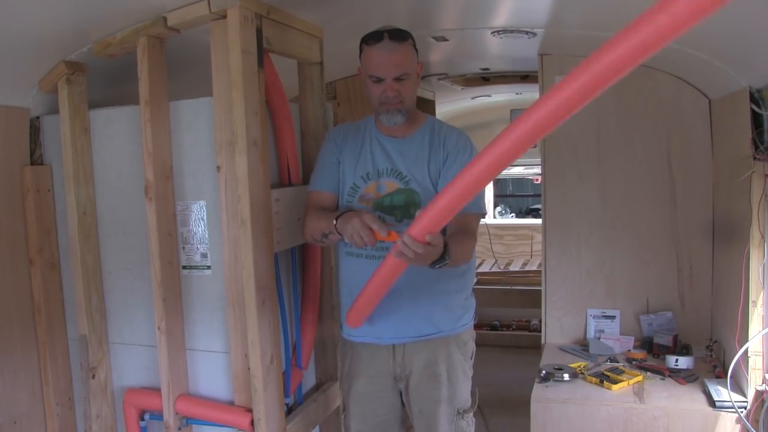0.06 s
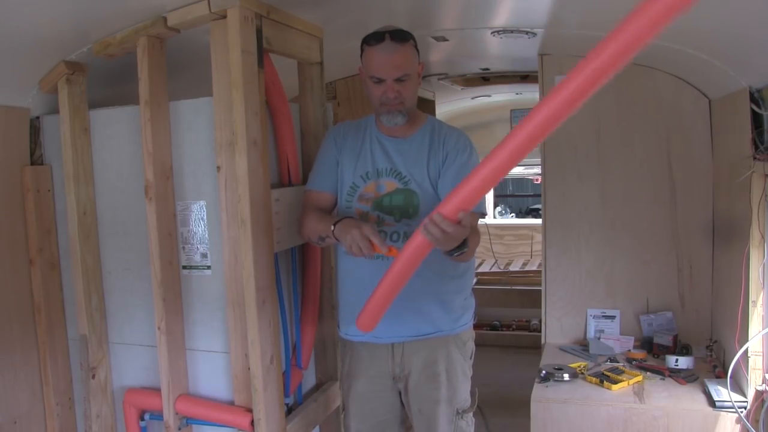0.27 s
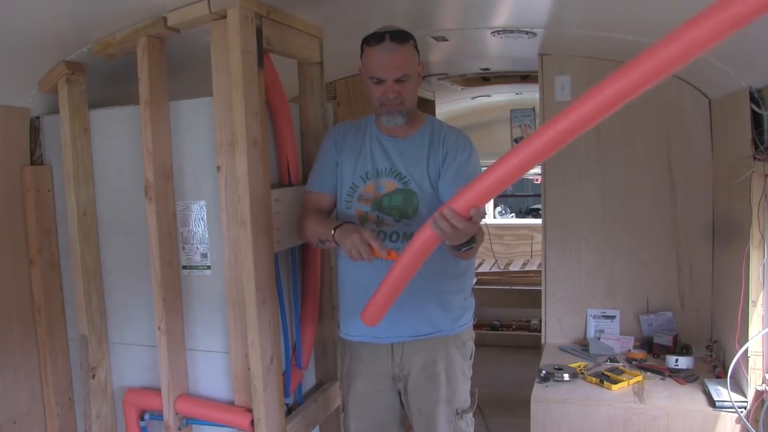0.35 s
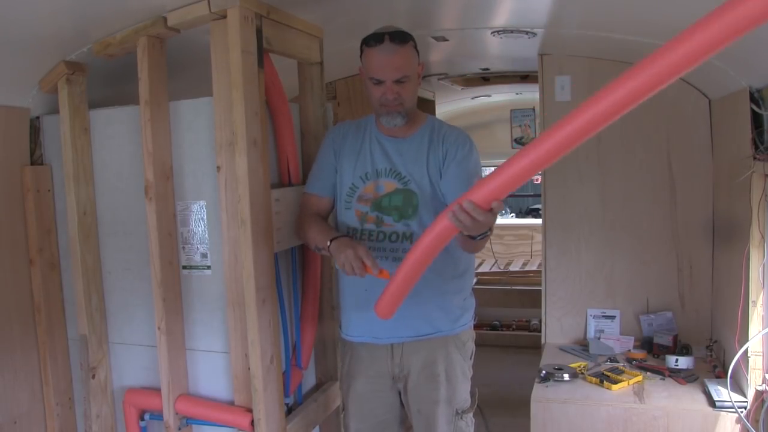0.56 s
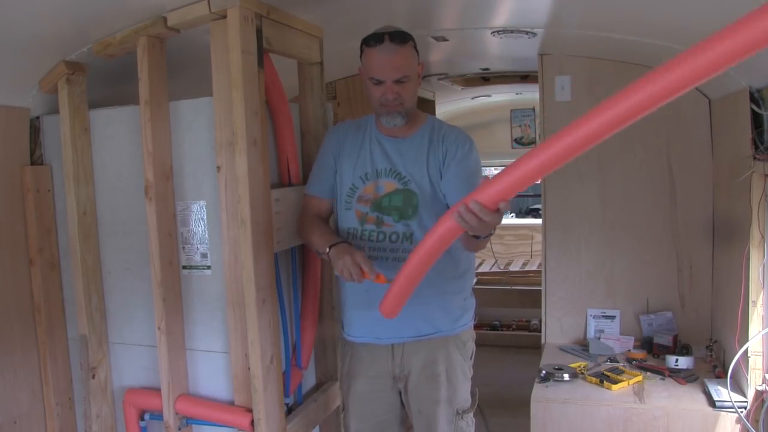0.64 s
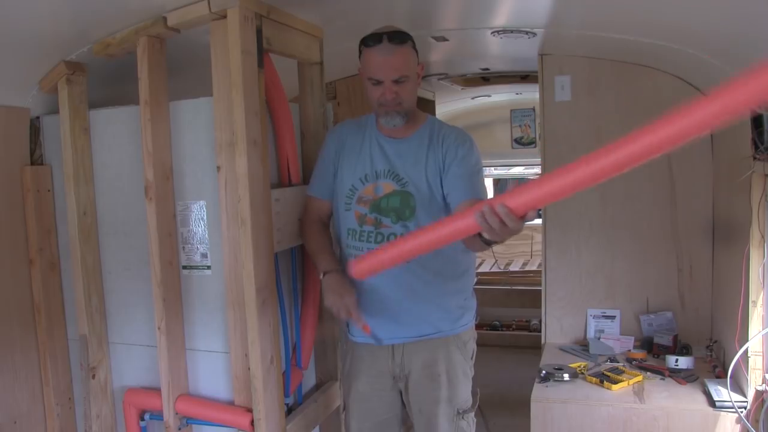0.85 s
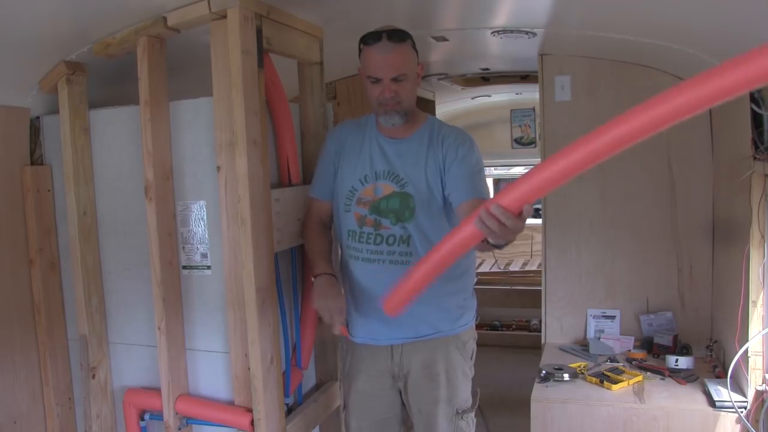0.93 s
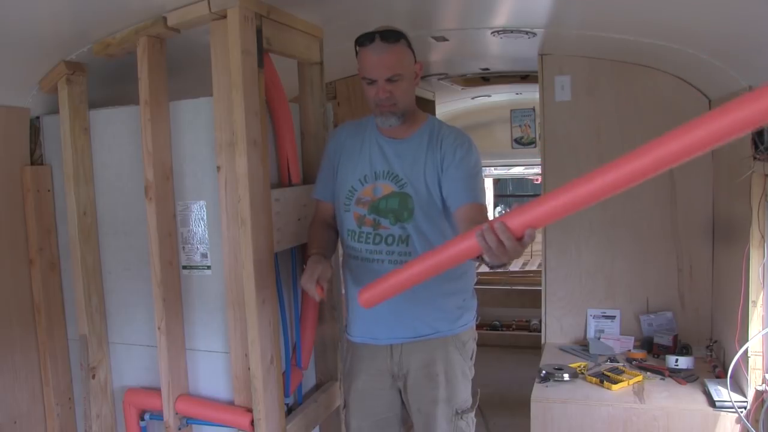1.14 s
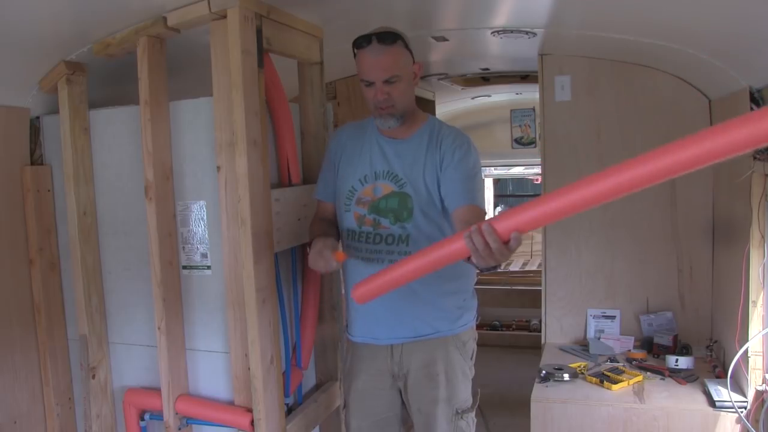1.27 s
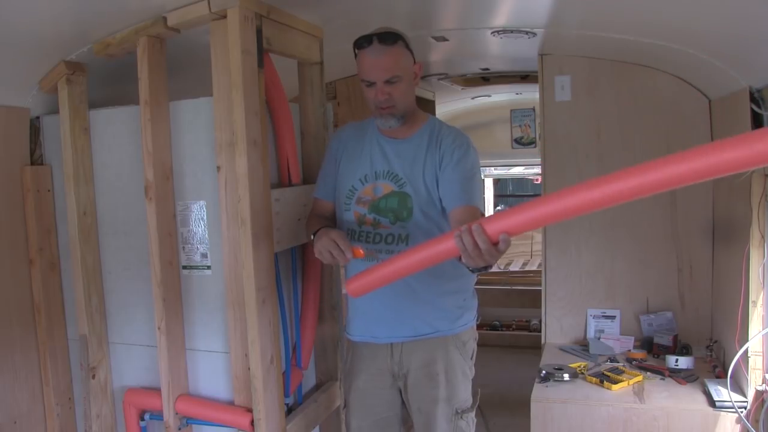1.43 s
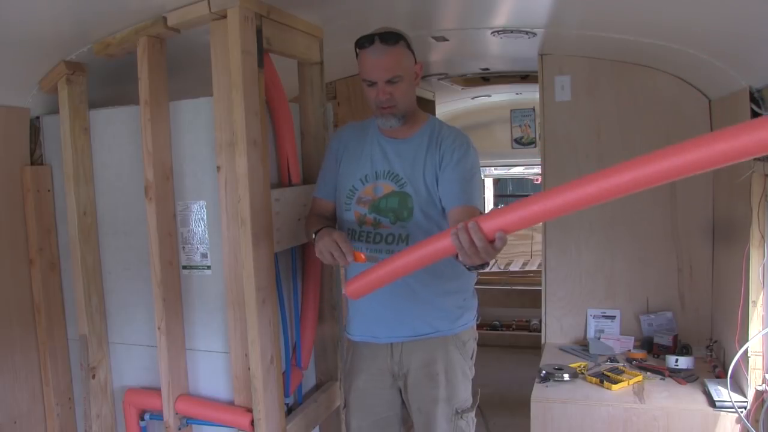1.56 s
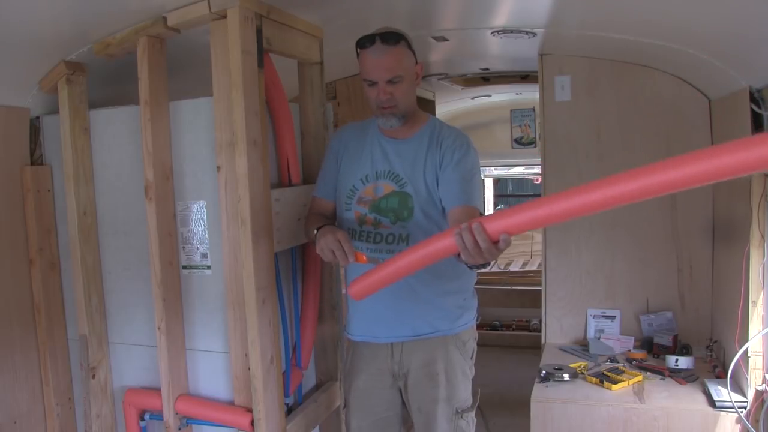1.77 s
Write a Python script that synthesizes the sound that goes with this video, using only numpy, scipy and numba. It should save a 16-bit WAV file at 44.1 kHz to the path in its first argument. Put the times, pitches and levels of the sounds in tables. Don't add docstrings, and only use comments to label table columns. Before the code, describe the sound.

Foam tube being cut: hands rub it softly for 0.2 s, then a blade rips it in five uneven, crackly, hollow strokes until about 0.97 s, with sharp snaps near 0.8 and 0.9. The freed end knocks and bounces dully from 0.98 to 1.1, rustling. Light rubbing fades by 1.4; two faint rising bird whistles follow at 1.5 and 1.65, with tiny creaks and faint rubbing. Close, small wooden room, quiet hiss.

```python
import sys
import numpy as np
from scipy import signal
from scipy.fft import rfft, irfft
from scipy.io import wavfile
from scipy.ndimage import uniform_filter1d
from numba import njit

SR = 44100
rng = np.random.default_rng(int(sys.argv[2]) if len(sys.argv) > 2 else 0)


def unload_wav(signal):
    wavfile.write(
        sys.argv[1],
        SR,
        np.round(np.clip(np.atleast_2d(signal).T, -1, 1) * 32767).astype(np.int16),
    )


def amplitude_ratio(level_db):
    exponent = np.asarray(level_db, float) / 20
    return 10 ** exponent


N = 79380


def level(x, db):
    return x * amplitude_ratio(db) / np.sqrt(np.mean(x ** 2))


@njit
def svf(x, hz, width):
    y = np.empty(len(x))
    band, low = 0., 0.
    for i in range(len(x)):
        g = np.tan(np.pi * hz[i] / SR)
        k = width / hz[i]
        v = (band + g * (x[i] - low)) / (1 + g * (g + k))
        low += 2 * g * v
        band = 2 * v - band
        y[i] = k * v
    return y


def walk(rate):
    hold = int(SR / rate)
    steps = rng.standard_normal(N // 40)[np.arange(N) // hold]
    slewed = uniform_filter1d(uniform_filter1d(steps, hold), hold)
    return 0.74 * slewed


def ring(at, hz, t60, push=0.):
    t = np.maximum(np.arange(N) / SR - at, 0)
    decay = np.exp(-np.log(1000) * t / t60)
    onset = 1 - np.exp(-t / push) if push else 1
    return np.sin(2 * np.pi * hz * t) * decay * onset


def air():
    # f/Hz, level/dB per Hz
    air_spectrum = [(18, -18), (30, -15), (114, -10), (208, -18), (399, -22), (874, -22.5), (1080, -25),
                    (1170, -25.5), (15500, -36)]
    knot_hz, knot_db = np.array(air_spectrum).T
    hz = np.maximum(np.arange(N // 2 + 1) * SR / N, 1)
    shape = amplitude_ratio(np.interp(np.log(hz), np.log(knot_hz), knot_db))
    noise = irfft(rfft(rng.standard_normal(N)) * shape, N)
    return level(noise, -58) * amplitude_ratio(1.4 * walk(4.7))


def bursting_cells():
    cells_per_s, spread_db, judder_db, judder_per_s = 14000, 1.5, 1.5, 160
    burst = rng.random(N) < cells_per_s / SR
    strength = amplitude_ratio(spread_db * rng.exponential(size=N)) * rng.standard_normal(N)
    return burst * strength * amplitude_ratio(judder_db * walk(judder_per_s)) + 1e-18


def tube_body(cells, favour, hollow, hum):
    # f/Hz, width/Hz, level/dB
    tube_modes = [(221, 136, -6), (637, 147, 1), (747, 227, -1.5), (971, 84, -2), (1170, 353, 1),
                  (1554, 443, 2.5), (1930, 348, 2.5), (2506, 570, 1.5), (3130, 866, -3)]
    favour_db, favour_oct, wander_db, wander_per_s, drift = 3.5, 0.61, 2.5, 45, .025
    body = 0
    for k, (hz, width, db) in enumerate(tube_modes):
        lift_db = favour_db * np.exp(-(np.log2(hz / favour) / favour_oct) ** 2)
        lift_db = lift_db + hollow * (700 < hz < 1150) + hum * (hz < 300)
        gain = amplitude_ratio(db + lift_db + wander_db * walk(wander_per_s))
        centre = hz * (1 + drift * walk(19.35))
        body = body + (-1) ** k * gain * svf(cells, centre, 1. * width)
    return body


def tearing_walls(cells):
    # f/Hz, width/Hz, level/dB
    tear_bands = [(4480, 2480, -11), (6330, 900, -10.5), (7140, 1340, -13), (12140, 6540, -19),
                  (13630, 9600, -20.5)]
    tear = 0
    for k, (hz, width, db) in enumerate(tear_bands):
        centre = np.full(N, 1. * hz)
        band = svf(svf(cells, centre, 2. * width), centre, 1. * width)
        tear = tear + (-1) ** k * amplitude_ratio(db + 2.0 + walk(39.3)) * band
    return tear


def rubbed_and_cut_foam():
    # t/s, effort/dB, favoured f/Hz, brightness/dB
    rub_strokes = [
        [(0.0, -37.5, 2520, 8.5), (0.03, -44, 2500, 9), (0.06, -51, 2070, 6), (0.092, -38, 1780, 4.5),
         (0.132, -51.5, 1810, 0), (.14, -40, 1870, 0.5), (.19, -36, 2110, 4), (0.218, -29.5, 2080, 3),
         (0.226, -36, 1990, 3)],
        [(1.15, -50, 1550, -3), (1.186, -64, 2280, 2), (1.194, -45, 2180, 3), (1.248, -50.5, 2310, 5.5),
         (1.28, -39.5, 2100, 9.5), (1.402, -74, 1970, 14), (1.43, -78.5, 1720, 13)],
        [(1.585, -52.5, 2800, 9), (1.6, -50, 2660, 2), (1.66, -56.5, 2180, -5), (1.71, -71, 2200, 16),
         (1.75, -53.5, 2550, 6.5), (1.8, -51, 2570, 6)],
    ]
    # t/s, effort/dB, favoured f/Hz, brightness/dB, hollowness/dB
    cut_strokes = [
        [(0.226, -26.5, 1560, 6.5, -1), (.24, -20.5, 1600, 3, 2), (.25, -25.5, 1720, 6, -12),
         (0.255, -15, 1710, 3, -21), (.272, -16, 1760, 1.5, -1), (.284, -13.5, 1800, -0.5, -12),
         (.305, -19.5, 1860, 4.5, 10), (0.32, -17, 1640, 2.5, 2.5), (0.352, -15.5, 1500, -4, -0.5)],
        [(.352, -21, 1970, 4.5, 7.5), (.4, -22, 1910, 2, 4.5), (0.455, -27, 1800, 5.5, 8),
         (0.49, -23, 1670, 3.5, -4.5)],
        [(0.49, -19.5, 1860, -5, -4), (.505, -20.5, 1730, 3.5, 5.5), (0.536, -16.5, 1280, 0.5, -4.5),
         (.57, -22, 1320, 2.5, 3.5), (.592, -23, 1440, 1.5, 1), (.604, -20, 1540, 2, -9),
         (.616, -25, 1420, 4.5, -3)],
        [(.616, -25.5, 1300, 8, 13.5), (.63, -21, 1280, -0.5, 1), (0.655, -18.5, 1510, 2, 2.5),
         (.68, -26.5, 1800, 3.5, 3), (0.714, -20, 1950, 3.5, -4.5), (0.734, -34.5, 1770, 7, 18.5),
         (0.77, -38, 1890, 14, -16)],
        [(0.77, -30, 2310, 2, 0), (.795, -18, 2500, -0.5, 1), (0.808, -15.5, 2500, 0, -3),
         (0.835, -18.5, 2430, -1, 11.5), (.86, -22, 1590, 4, 4.5), (0.885, -17, 1300, -1.5, 4.5),
         (.905, -22, 1420, -4, 6.5), (0.936, -33.5, 1540, 8, 11.5), (0.975, -32.5, 1900, -6, -12)],
    ]
    # t/s, effort/dB, favoured f/Hz, brightness/dB
    settle_strokes = [
        [(.975, -38, 2100, 5), (1.01, -34.5, 1960, -3), (1.04, -43.5, 1980, 9), (1.06, -40, 1910, 3.5),
         (1.15, -54.5, 2000, 8)],
    ]
    hum_steady, hum_at_db = 0.59, -19.5
    t = np.arange(N) / SR
    effort, hollow, bright, hum = np.zeros((4, N))
    favour = np.full(N, 1170.)
    for rows in cut_strokes + rub_strokes + settle_strokes:
        s, db, hz, bright_db, *hollow_db = np.array(rows).T
        on = (t >= s[0]) & (t <= s[-1])
        effort_db = np.interp(t[on], s, db)
        effort[on] = amplitude_ratio(effort_db)
        favour[on] = np.interp(t[on], s, hz)
        bright[on] = np.interp(t[on], s, bright_db)
        hollow[on] = np.interp(t[on], s, hollow_db[0]) if hollow_db else 0
        hum[on] = hum_steady * (hum_at_db - effort_db) if hollow_db else 0
    effort = uniform_filter1d(effort, size=90)
    cells = bursting_cells()
    both = tube_body(cells, favour, hollow, hum) + amplitude_ratio(bright) * tearing_walls(cells)
    slow_rms = np.sqrt(uniform_filter1d(both ** 2, size=2600))
    return effort * both / slow_rms


def knocks():
    # t/s, peak level/dB, f/Hz, ring T60/s, hardness/dB
    knock_events = [(0.134, -35.5, 501, 0.034, 1), (0.977, -10.5, 192, 0.037, -4.5),
                    (0.993, -13, 136, 0.027, 4), (.996, -20.5, 391, 0.042, 6), (.996, -28.5, 693, 0.079, 4),
                    (1.004, -9, 253.5, 0.032, -1.5), (1.016, -9.5, 360, 0.026, -1),
                    (1.026, -21.5, 210, 0.049, -12), (1.046, -17.5, 435, 0.029, 1),
                    (1.056, -8.5, 263, 0.019, -1), (1.067, -16, 343, 0.04, -5),
                    (1.079, -22, 472, 0.031, -9), (1.092, -37, 405, 0.029, 13),
                    (1.105, -25.5, 273, 0.03, -7), (1.1963, -24.5, 169, 0.03, -12),
                    (1.2117, -22.5, 148, 0.017, -19), (1.244, -36.5, 149, 0.03, -25),
                    (1.269, -43, 104, 0.14, -17)]
    # frequency ratio, level/dB
    overtones = [(.55, -16), (1.699, -6.5), (2.4, -7)]
    gain_db, push_s = 5, 0.0027
    boom_hz, boom_db, boom_t60_s = 112.8, -24, .35
    out = 0
    for at, db, hz, t60, hard_db in knock_events:
        blow = ring(at, hz, t60, push_s)
        for ratio, part_db in overtones:
            blow = blow + amplitude_ratio(part_db + hard_db) * ring(at, ratio * hz, t60, push_s)
        boards = amplitude_ratio(boom_db) * ring(at, boom_hz, boom_t60_s, push_s)
        out = out + amplitude_ratio(db + gain_db) * (blow + boards)
    return out


def snaps():
    # t/s, peak level/dB, f/Hz, ring T60/s, bright edge/dB
    snap_events = [(0.1362, -34, 1980, 0.02, -21), (0.2284, -28, 1520, 0.022, -22),
                   (0.2369, -20, 1530, 0.06, -24), (0.253, -17, 1713, 0.049, -25),
                   (0.283, -13, 2730, 0.014, -9), (0.296, -11.5, 1870, 0.032, -25),
                   (0.347, -9.5, 1330, 0.021, -7.5), (.4947, -10, 1920, 0.011, -9),
                   (0.6007, -11.5, 1415, 0.043, -26), (0.6253, -18, 1190, 0.024, -20),
                   (0.6446, -20, 1660, .025, -30), (0.655, -15.5, 1640, 0.018, -11),
                   (.782, -14.5, 2350, .012, -19), (0.8, -2, 2410, 0.01, -13),
                   (0.8046, -7.5, 2560, 0.031, -23), (0.805, -12.5, 3980, 0.032, -11),
                   (0.9022, -1, 1380, 0.0032, -10), (.9745, -27, 2230, 0.0064, -8),
                   (.976, -27, 3430, 0.027, -23), (0.9972, -18, 2020, 0.011, -26),
                   (.9966, -29.5, 5840, 0.016, -21), (1.007, -41, 6000, .015, -14),
                   (1.0486, -23.5, 2060, 0.015, -22), (1.0475, -43, 5650, .008, -10),
                   (1.1936, -35.5, 2830, 0.014, -10), (1.195, -41, 5700, 0.0076, 0),
                   (1.205, -42, 1630, 0.022, -4), (1.2046, -35, 6650, 0.014, -14),
                   (1.205, -40, 8100, .012, -10), (1.597, -40, 1420, .01, -11)]
    t = np.arange(N) / SR
    centre = np.full(N, 6000.)
    grit = level(svf(svf(rng.standard_normal(N), centre, 4100.0), centre, 4300.0), 0)
    out = 0
    for at, db, hz, t60, edge_db in snap_events:
        edge = grit * (t > at) * np.exp(-np.log(1000) * np.abs(t - at) / t60)
        out = out + amplitude_ratio(db) * (ring(at, hz, t60) + amplitude_ratio(edge_db) * edge)
    return out


def creaks():
    # t/s, length/s, level/dB, f/Hz, width/Hz
    creak_events = [(1.71, .035, -56, 1370, 200), (1.747, .012, -52, 1300, 300),
                    (1.759, .014, -50, 1400, 450), (1.771, .01, -55, 1650, 500),
                    (1.786, .02, -48, 1450, 250), (1.632, .016, -55, 3700, 400),
                    (1.647, .012, -56, 3550, 500), (1.6, .08, -57, 4300, 1000), (1.71, .05, -61, 4400, 500),
                    (.685, .05, -26, 1915, 60), (.25, .05, -28, 600, 110), (.32, .04, -30, 620, 90),
                    (1.25, .1, -50, 2200, 250), (.65, .12, -38, 380, 250), (.79, .12, -34, 450, 250)]
    t = np.arange(N) / SR
    slips = (rng.random(N) < 5000 / SR) * rng.standard_normal(N)
    out = 0
    for at, length, db, hz, width in creak_events:
        centre = np.full(N, 1. * hz)
        swell = np.sin(np.pi * np.clip((t - at) / length, 0, 1))
        tone = swell * svf(svf(slips, centre, 1. * width), centre, 1. * width)
        out = out + level(tone, db) * np.sqrt(np.mean(swell ** 2))
    return out


def bird():
    # t/s, f/Hz, level/dB
    whistles = [
        [(1.5, 1620, -62), (1.52, 2000, -52.5), (1.552, 3250, -45), (1.562, 3563, -46.5), (1.575, 3600, -48),
         (1.592, 3590, -72), (1.603, 3600, -46), (1.61, 3740, -60)],
        [(1.648, 1700, -57), (1.664, 1960, -50), (1.672, 2360, -48.5), (1.683, 3050, -45.5), (1.695, 3410, -49),
         (1.704, 3690, -53), (1.713, 3850, -65)],
    ]
    t = np.arange(N) / SR
    out = 0
    for rows in whistles:
        s, hz, db = np.array(rows).T
        on = uniform_filter1d(1. * ((t > s[0]) & (t < s[-1])), size=200)
        flutter_db = 4 * walk(320)
        loudness = np.sqrt(2) * amplitude_ratio(np.interp(t, s, db) + flutter_db)
        phase = 2 * np.pi * np.cumsum(np.interp(t, s, hz)) / SR
        out = out + on * loudness * np.sin(phase)
    return out


@njit
def walls(x, lags, gain, damp):
    line, soft, out = np.zeros((8, 4096)), np.zeros(8), np.zeros(len(x))
    for i in range(len(x)):
        total = 0.
        for k in range(8):
            echo = gain[k] * line[k, (i - lags[k]) & 4095]
            soft[k] += (1 - damp) * (echo - soft[k])
            total += soft[k]
        out[i] = soft[0] - soft[3] + soft[5] - soft[6]
        for k in range(8):
            line[k, i & 4095] = x[i] + soft[k] - total / 4
    return out


def scene():
    near = rubbed_and_cut_foam() + knocks() + snaps() + creaks()
    far = bird()
    mic_low_cut = signal.butter(3, 102, "high", fs=SR, output="sos")
    near = signal.sosfilt(mic_low_cut, near)
    t60_s, damp, near_wet_db, bird_wet_db = 0.38, 0.47, -14, -11
    lags = np.array([331, 467, 593, 719, 877, 1013, 1181, 1367])
    sent = amplitude_ratio(near_wet_db) * near + amplitude_ratio(bird_wet_db) * far
    wet = walls(sent, lags, amplitude_ratio(-60 * lags / SR / t60_s), damp)
    return (near + far + wet + air())[None]


def band_limit(x):
    return signal.sosfilt(signal.butter(12, 17000, fs=SR, output="sos"), x)


def record(dry):
    ceiling, top_hz = .7, 15800
    rounded = ceiling * np.tanh(dry / ceiling)
    top_cut = signal.ellip(10, .2, 80, top_hz, fs=SR, output="sos")
    mix = signal.sosfilt(top_cut, rounded)
    return band_limit(mix)


dry = scene()
out = record(dry)
unload_wav(out)
```